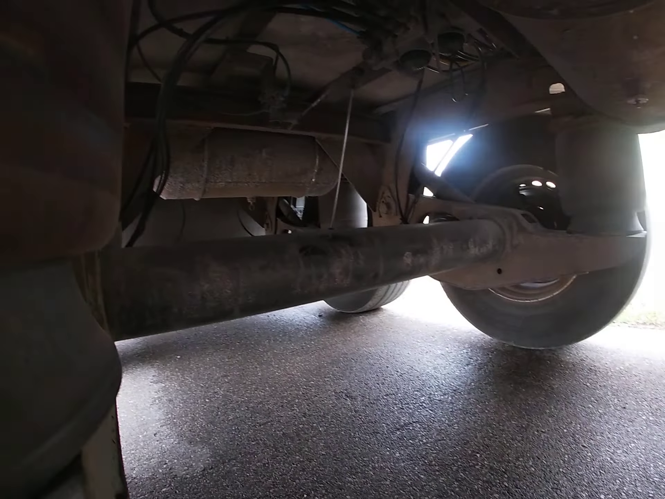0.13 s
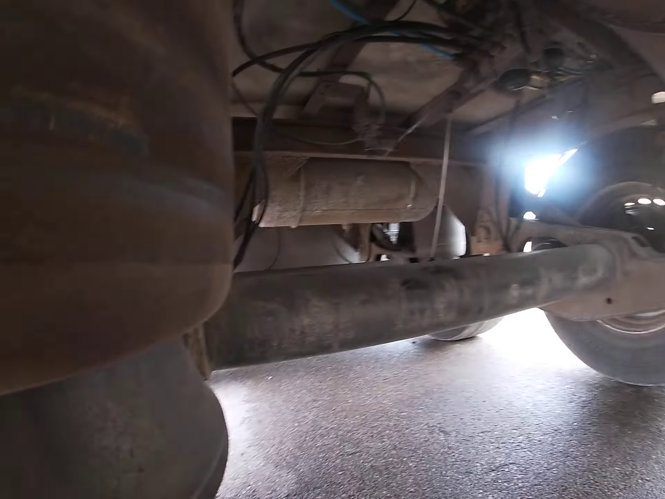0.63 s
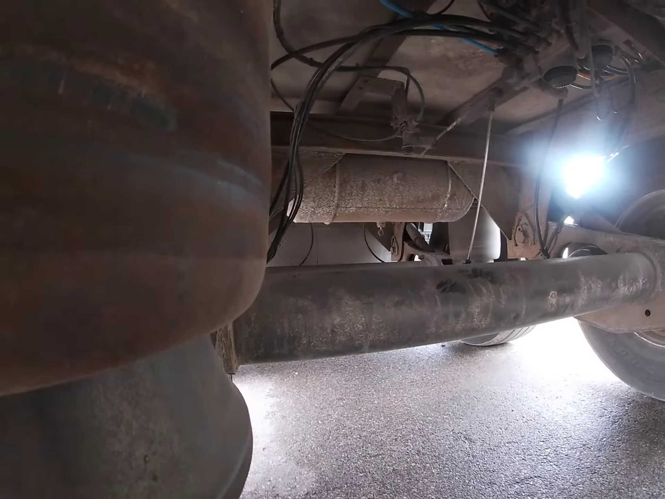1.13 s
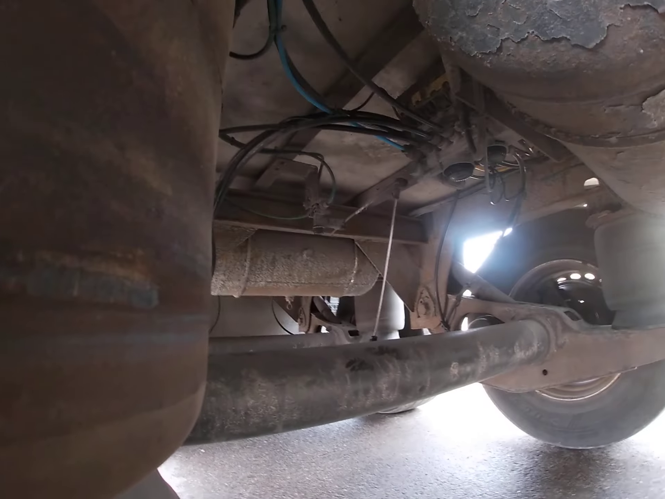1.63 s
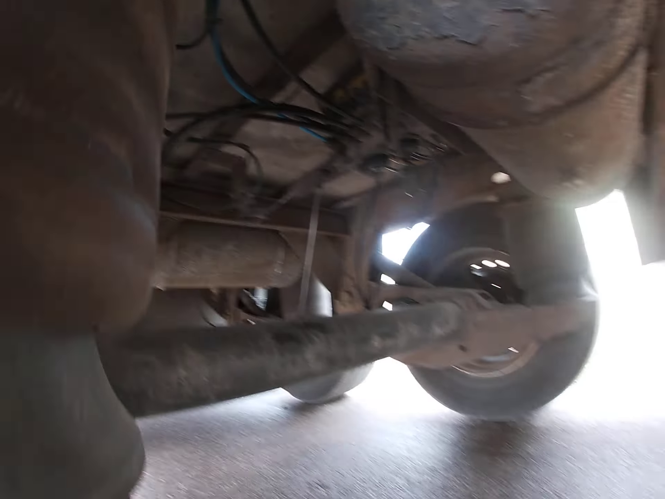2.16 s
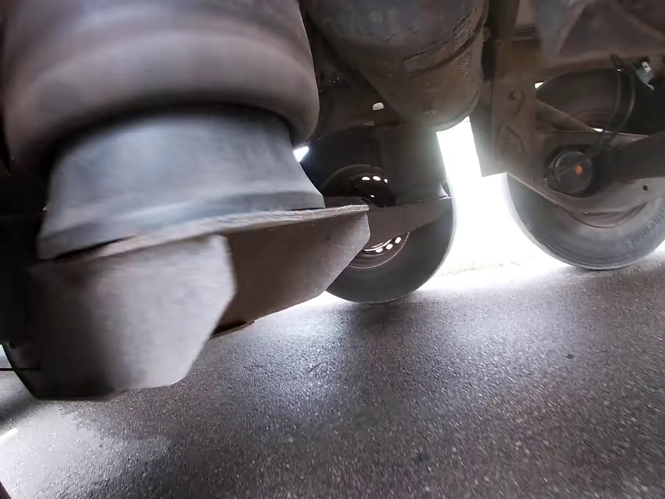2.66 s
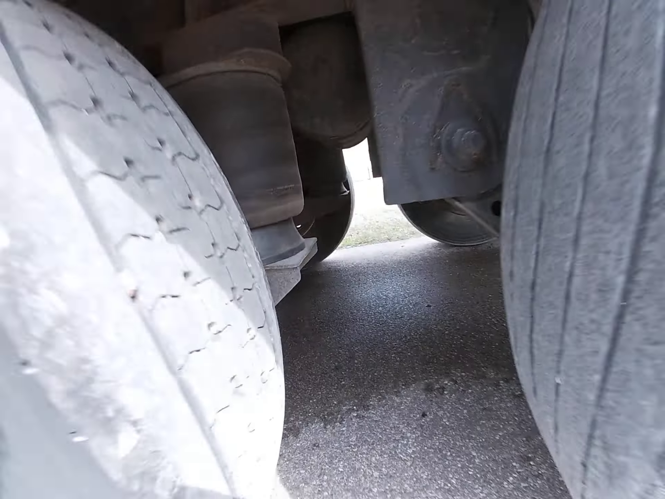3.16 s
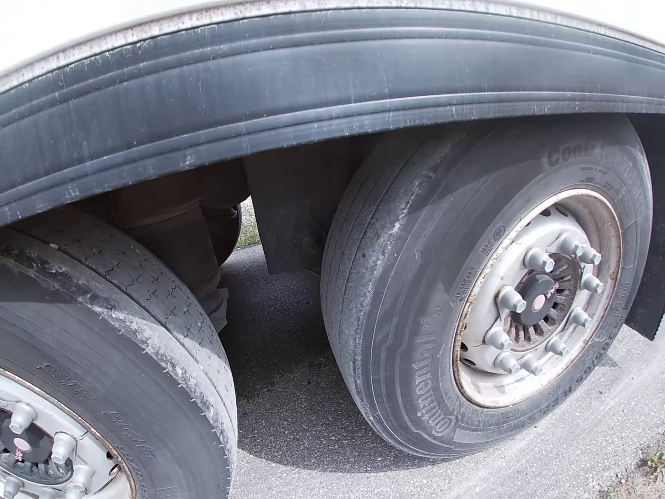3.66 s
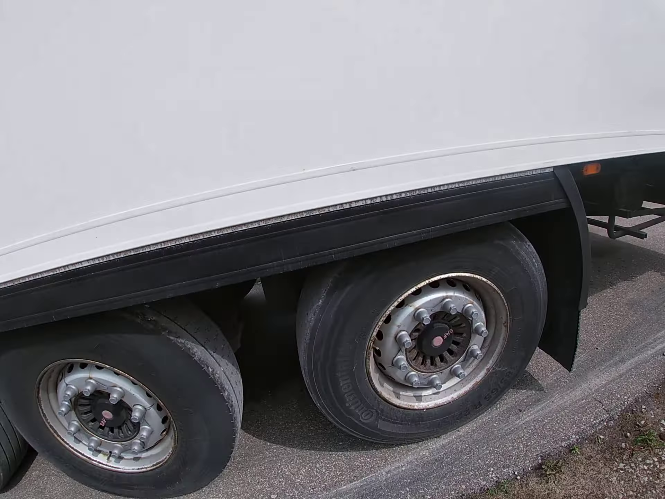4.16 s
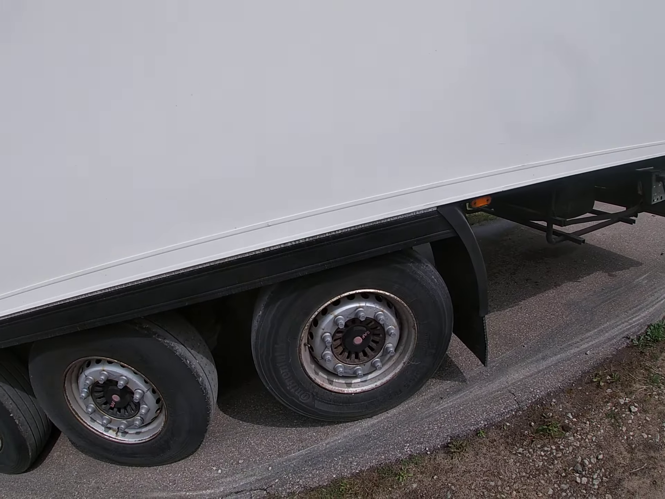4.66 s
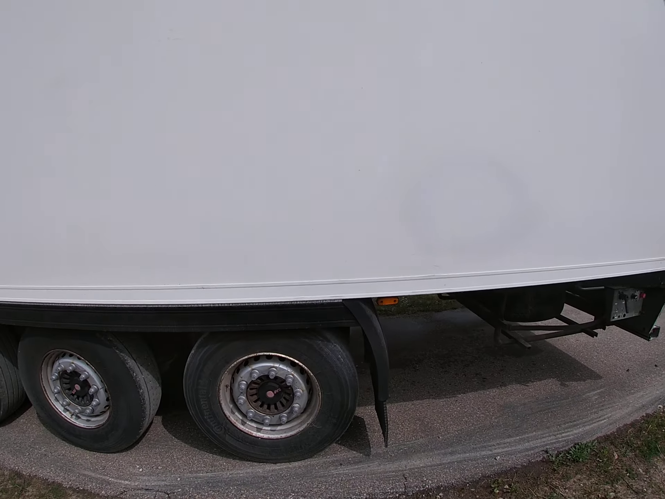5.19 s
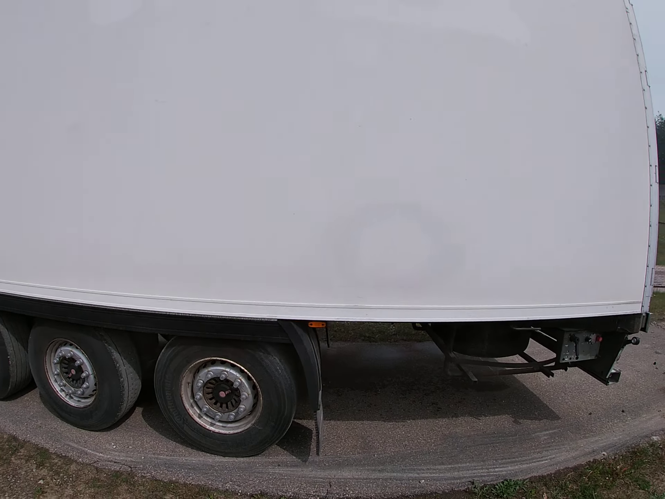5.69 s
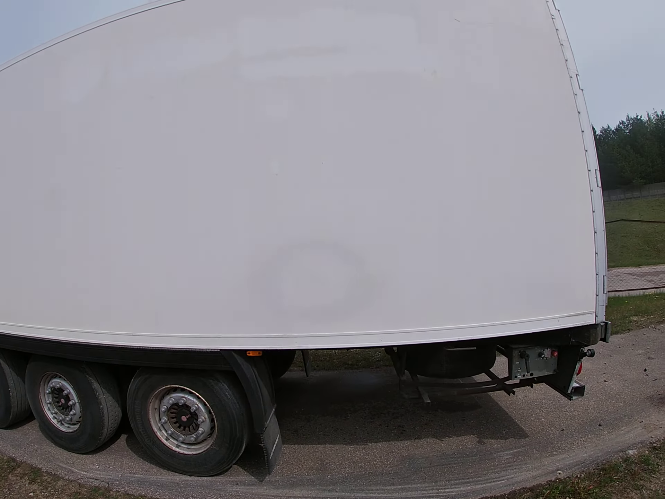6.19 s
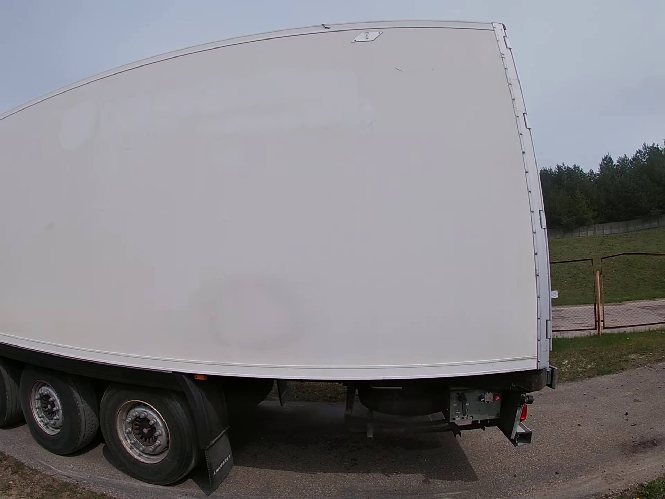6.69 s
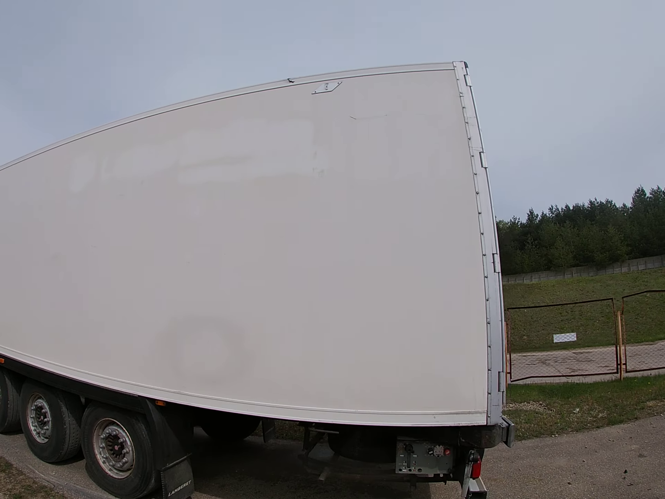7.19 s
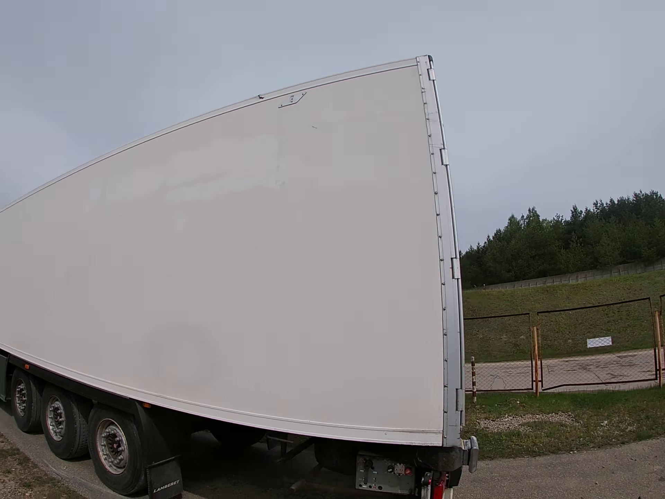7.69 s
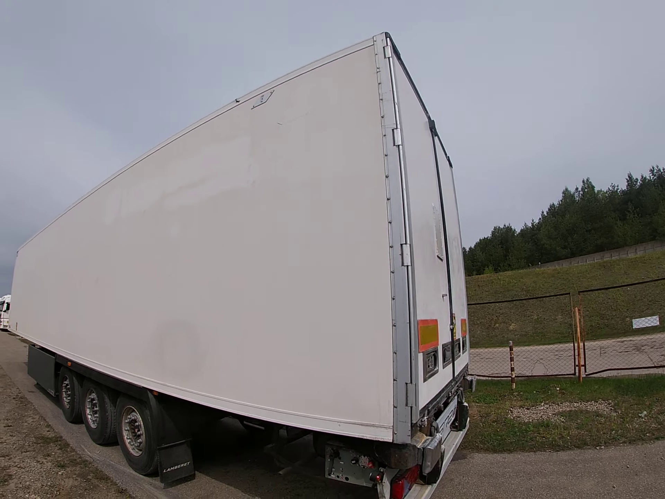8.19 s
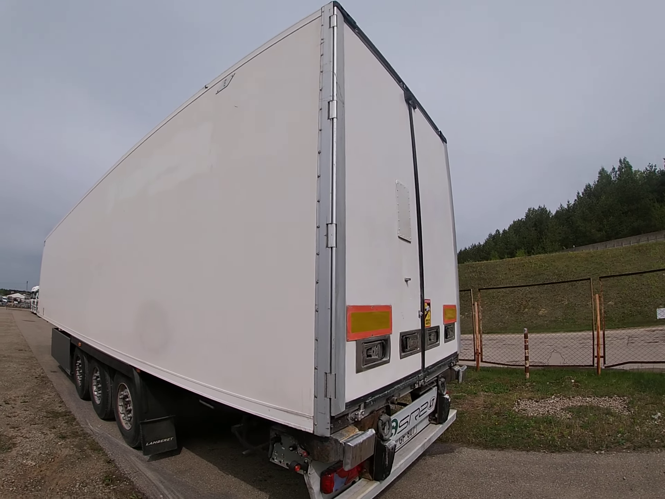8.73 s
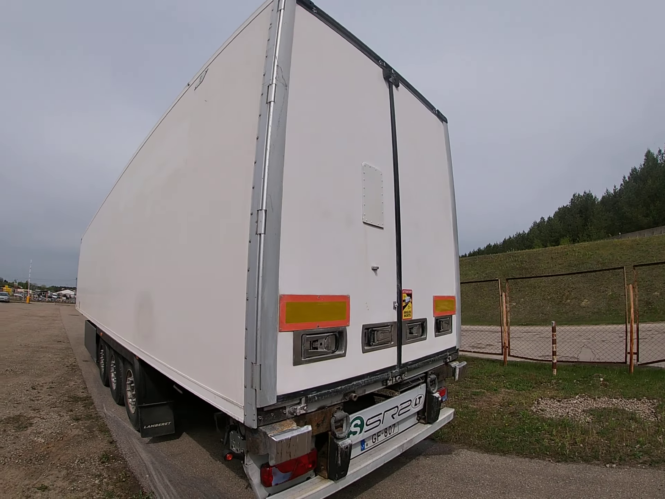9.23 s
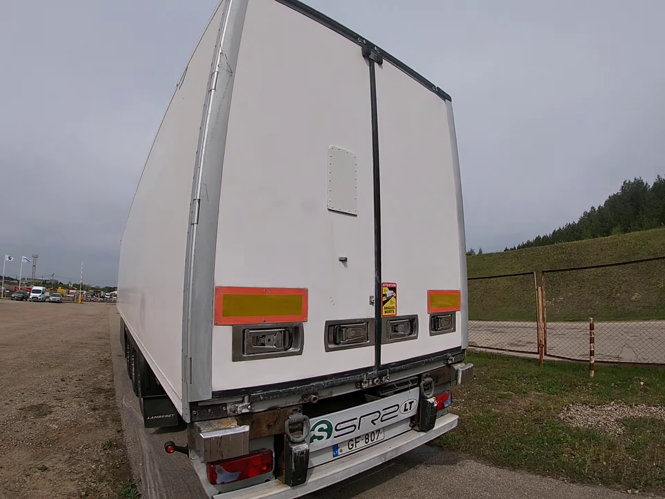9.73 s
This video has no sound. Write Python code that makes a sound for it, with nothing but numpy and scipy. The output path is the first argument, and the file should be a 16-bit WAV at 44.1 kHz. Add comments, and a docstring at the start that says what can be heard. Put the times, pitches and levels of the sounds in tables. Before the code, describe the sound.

Under a parked refrigerated trailer, a cooling-unit diesel drones with a deep, fluttering beat over dull fan roar and faint hiss. The handheld camera's plastic case clicks and creaks close to the microphone. It is then carried outside: shoes scuff grit, a sole squeaks briefly, and wind buffets the microphone while the drone dips and swells.

```python
"""Under and around a refrigerated trailer

The diesel of a trailer's cooling unit drones at a nearly fixed speed, its compressor beating against the firing:
sines at sums of crankshaft and compressor turns, over coloured noise for fans and block.
A hand-held camera sits under the axles, its plastic case creaking as damped modes, then is carried out
over gritty ground (scuffs of spiky grains, one squeak) round the back of the trailer, where noise swells of wind
buffet the microphone. The drone swells and dips, often sinking after hard gusts, as if the recorder turns itself down."""
import sys
import numpy as np
from scipy import signal
from scipy.fft import rfft, irfft, next_fast_len
from scipy.io import wavfile
from scipy.ndimage import uniform_filter1d, map_coordinates

SR = 44100
rng = np.random.default_rng(int(sys.argv[2]) if len(sys.argv) > 2 else 0)


def invert_db(x):
    """Field ratio 10**(x/20) for x, a level in decibels (scalar or array-like)."""
    u = np.asarray(x, float) / 20
    return 10 ** u


def wrap_up_sound(samples):
    """Save the sound to the file named by the first command line argument, as 16-bit audio."""
    columns = np.atleast_2d(samples).T
    # keep every value between -1 and 1, then stretch to whole-number steps
    tamed = np.clip(columns, -1, 1)
    steps = np.round(tamed * 32767).astype(np.int16)
    wavfile.write(sys.argv[1], SR, steps)


N = 434385

# The walk out from under the trailer. Each row: time in seconds, share of open air round the microphone 0-1.
OPEN_AIR = [(0, 0.03), (2.6, 0), (3.15, 0.24), (3.6, 0.98), (9.85, 0.96)]

# Treble hiss. Each row: frequency in Hz, relative level per Hz in dB.
HISS_COLOUR = [(4500, -19), (6000, 1), (7500, 0), (8500, -8), (9500, -24.5)]
# When the hiss fades from its level under the trailer to that outside: start and end in seconds.
HISS_FADE_S = (2.5, 5.3)
HISS_UNDER_DB, HISS_OPEN_DB, HISS_FLICKER_DB = -78, -92, 2.5

# Roar of fans and engine block. Each row: time in seconds, level in dB.
ROAR_LEVEL = [(0, -41), (1.4, -40.5), (2.6, -41.5), (3.26, -45), (3.7, -45), (4.44, -43.5), (4.83, -38.5),
              (5.1, -44), (5.6, -41.5), (6.4, -43), (7.35, -43.5), (8.12, -40), (8.6, -43), (9.4, -41.5),
              (9.85, -43.5)]
# Its colour under the trailer, and outside. Each row: frequency in Hz, relative level per Hz in dB.
ROAR_UNDER = [(82, -33), (140, -9.5), (158, -16), (202, -5), (248, -14.5), (316, -8), (390, -15.5),
              (448, -18.5), (542, -16.5), (994, -22), (1860, -36.5), (7060, -53), (8840, -73.5),
              (11500, -107), (19400, -120)]
ROAR_OPEN = [(150, -31), (250, -10), (391, -5), (504, -4.5), (650, -10.5), (1110, -17), (1590, -18),
             (1790, -22.5), (2110, -24.5), (2270, -25.5), (5010, -41), (5650, -46), (8840, -81.5),
             (11500, -109), (19400, -120)]
# Fuzzy fan lines, low to high. Each row: frequency in Hz, half-width at half amplitude in Hz.
FAN_LINES = [(1200, 250), (1580, 150), (2079, 120)]
# Fan lines over time. Each row: time in seconds, low, middle and upper line level in dB.
FAN_LEVELS = [(0, -76.5, -69.5, -78.5), (2.9, -66.5, -75, -78), (3.5, -52, -62, -72),
              (4.3, -52, -53.5, -61), (4.9, -61.5, -52, -60.5), (5.6, -65, -59.5, -63),
              (7.3, -71.5, -70.5, -67), (8.2, -59.5, -62, -67), (9.85, -50, -60.5, -73.5)]

# Wind at the microphone, its low and its upper band. Each row: time in seconds, level in dB.
BUFFET_LEVEL = [(0, -41), (2.35, -36), (2.7, -28.5), (3.1, -22.5), (3.55, -28.5), (3.95, -19.5),
                (4.3, -26.5), (4.63, -37), (4.86, -20.5), (5.1, -25), (5.4, -28.5), (6.4, -23.5),
                (6.68, -39.5), (6.94, -28), (7.4, -24.5), (7.78, -37), (8.15, -25.5), (8.8, -32.5),
                (8.92, -36), (9.3, -33), (9.85, -33.5)]
BITE_LEVEL = [(0, -40), (2.6, -44), (3.1, -40), (3.3, -40), (3.5, -32.5), (3.75, -40.5), (4.1, -35.5),
              (4.6, -44.5), (4.78, -34.5), (5.0, -33.5), (5.3, -40.5), (5.9, -47), (6.6, -46.5), (7.3, -42),
              (7.8, -45.5), (8.2, -45), (8.6, -35), (9.1, -38.5), (9.5, -32), (9.85, -30.5)]
# Colours of the two bands. Each row: frequency in Hz, relative level per Hz in dB.
BUFFET_COLOUR = [(5, -13), (15, -3.5), (30, -6), (50, 2.5), (75, 1), (125, -2.5), (170, -11.5), (300, -33),
                 (800, -71.5)]
BITE_COLOUR = [(60, -30), (130, -3), (200, 0), (290, -5), (400, -18), (700, -32), (1200, -55)]
# Depth of fast lumps in both bands, and of slower lulls in the open in the low and the upper band.
LUMPS_DB, BUFFET_LULLS_DB, BITE_LULLS_DB = 1, 3, 1.2
# Short low shoves of air. Each row: start in seconds, length in seconds, peak of the swell in dB.
SHOVES = [(3.03, 0.051, -22), (3.28, 0.077, -17), (4.19, 0.094, -22), (5.03, 0.046, -23),
          (6.35, 0.093, -22), (6.49, 0.063, -19), (7.2, 0.1, -28), (8.752, 0.08, -15)]
# Hard gusts that thump the microphone. Each row: start in seconds, peak of the swell in dB, its upper edge in dB.
THUMPS = [(3.977, -28.5, -48), (4.003, -26, -37.5), (4.033, -25, -52), (4.051, -30, -51),
          (4.089, -38, -36.5), (4.107, -29, -44), (4.17, -31, -56), (4.201, -26.5, -51), (4.737, -31, -46),
          (4.777, -39, -48), (4.834, -28, -47), (4.905, -27, -50), (4.955, -25, -50), (4.991, -33, -53),
          (5.051, -32, -45), (5.223, -36, -46), (6.515, -36, -52), (7.22, -28, -38), (7.47, -27, -47),
          (8.759, -22.5, -51), (8.777, -24.5, -51)]
THUMP_S = 0.016
# Colours of the thump and of its upper edge. Each row: frequency in Hz, relative level per Hz in dB.
THUMP_COLOUR = [(40, -7.5), (120, 1.5), (250, 4.5), (380, -3), (600, -20), (900, -40)]
THUMP_EDGE_COLOUR = [(300, -12), (500, 0), (700, -4), (1000, -15), (1500, -28), (2000, -42)]
# Broad roar of the strongest gusts. Each row: start in seconds, length in seconds, peak of the swell in dB.
GUSTS = [(3.96, .2, -47), (4.17, .1, -48), (4.69, .3, -42), (4.86, .3, -42)]

# Shoes scuffing on grit. Each row: start in seconds, length in seconds, peak of the swell in dB.
SCUFFS = [(3.16, 0.04, -64), (3.195, 0.11, -62), (3.245, 0.14, -59), (3.345, 0.022, -59),
          (3.412, 0.02, -65), (4.09, 0.14, -59), (4.24, 0.055, -58), (4.77, 0.21, -60), (4.84, 0.043, -59),
          (4.882, 0.019, -67), (4.938, 0.041, -54.5), (5.565, 0.041, -53.5), (5.61, 0.036, -64),
          (6.129, 0.052, -64.5), (6.768, 0.072, -58), (7.802, 0.27, -63), (9.618, 0.058, -63)]
# Colour of the grit. Each row: frequency in Hz, relative level per Hz in dB.
GRIT_COLOUR = [(800, -24), (1500, 5), (2500, 6), (3500, -2), (5000, -5), (6500, -19), (9000, -20.5),
               (10500, -61.5)]
GRIT_CLUMPS_DB = 2.5
# Squeak of a sole. Each row: time in seconds, pitch in Hz, level in dB.
SQUEAK = [(3.24, 3750, -81), (3.255, 3700, -69), (3.275, 3450, -60), (3.3, 3300, -64), (3.318, 3280, -63),
          (3.33, 3250, -85)]
# Overtone as a frequency ratio, its relative level, and phase scatter in radians.
SQUEAK_OVERTONE, SQUEAK_OVERTONE_DB, SQUEAK_ROUGH = 1.4, -3, 0.49

# Creaks of the camera's case. Each row: start in seconds, low, middle and top modes' peak in dB.
CREAKS = [(0.7903, -37, -52, -73), (0.8026, -38, -57, -66), (0.8974, -30.5, -39.5, -63),
          (0.9721, -30.5, -43, -63.5), (1.0045, -30.5, -43, -62), (1.1885, -22.5, -25, -46.5),
          (1.385, -36, -21, -34), (1.4507, -31, -19, -31), (1.4843, -38, -19.5, -33.5),
          (1.52, -32, -26, -41), (2.3092, -34.5, -39.5, -55), (2.852, -53, -40, -48),
          (2.8779, -57, -46, -52), (2.897, -36, -43, -61.5), (3.332, -62, -58, -58.5),
          (3.347, -59, -54, -55.5), (3.354, -64, -59, -59), (3.421, -56, -45, -64), (4.6064, -51, -50, -52),
          (4.847, -47, -41, -66), (5.452, -50, -64, -59), (5.508, -53, -50, -60), (5.572, -60, -56, -56.5),
          (5.608, -63, -58, -57.5), (9.0634, -49, -44, -54)]
# Faint dull slips of the case. Each row: start in seconds, peak of the low modes in dB, pitch in Hz.
SLIPS = [(0.0605, -40, 1250), (0.085, -42.5, 1290), (0.106, -41, 1150), (0.118, -46, 1280),
         (0.133, -37, 1350), (0.144, -38, 1350), (0.158, -43, 1350), (0.175, -41, 1450),
         (0.1925, -39, 1430)]
SLIP_DULL_DB = 29  # how much weaker a slip rings the middle modes than the low ones
# Low, middle and top modes of the case. Each row: frequency in Hz, bandwidth in Hz, relative level in dB.
LOW_MODES = [(1400, 150, 10), (1130, 310, -11), (1530, 150, -4)]
MIDDLE_MODES = [(1100, 350, -7), (1560, 330, -1), (2400, 240, -6), (3070, 340, 0.5), (3800, 500, -2),
                (4250, 330, -0.5)]
TOP_MODES = [(5350, 250, -5), (6030, 330, 0), (6600, 300, -7), (7560, 600, 0), (8680, 220, -15),
             (9750, 1000, -7)]

# The drone over time, often sinking after hard gusts.
# Each row: time in seconds, firing tone level in dB, its octave level in dB.
FIRING_LEVELS = [(0, -13.5, -31), (2.4, -14, -29), (2.96, -14.5, -27), (3.3, -21.5, -25.5),
                 (3.6, -29.5, -29.5), (4.1, -23, -37.5), (4.4, -37.5, -40.5), (4.7, -28.5, -31.5),
                 (4.85, -18.5, -42), (5.05, -19.5, -25.5), (5.21, -27.5, -33.5), (5.45, -21.5, -40.5),
                 (5.8, -17, -27.5), (6.25, -16.5, -33.5), (6.62, -22.5, -39), (6.95, -16, -29),
                 (7.3, -22.5, -30), (7.9, -23, -32), (8.07, -18, -25.5), (8.72, -18.5, -30),
                 (8.8, -28, -25), (9.0, -33, -35), (9.41, -20.5, -22), (9.71, -22.5, -27),
                 (9.85, -23.5, -22)]
FIRING_HZ_UNDER, FIRING_HZ_OPEN, THROB_HZ = 51.35, 51.21, 33.6  # throb: one compressor turn
THROB_UNDER_DB, THROB_OPEN_DB = -30.5, -26.5
# Weaker tones. Each row: crankshaft multiple, compressor multiple, level under the trailer in dB,
# level outside in dB, both before the gain over time.
PARTIALS = [(0, .5, -51, -50), (1.0, 0, -44, -47), (1.5, 0, -49, -52), (1.0, .5, -46, -50),
            (9.0, 1, -53, -58), (4.5, 0, -39, -41), (6.0, 0, -61, -41), (8.0, 0, -50, -45),
            (10.0, 0, -57, -51), (11.0, 0, -69, -55), (11.5, 0, -57, -67), (12.0, 0, -44, -54),
            (13.0, 0, -59, -59), (14.0, 0, -52, -60), (17.0, 0, -57, -59), (18.0, 0, -58, -70),
            (28.0, 0, -65, -76), (2.0, 1, -43, -39), (4.0, 1, -46, -48), (6.0, 1, -44, -47),
            (8.0, 1, -56, -62), (10.0, 1, -57, -67), (16.0, 1, -52, -70), (2.0, -1, -50, -56),
            (4.0, -1, -44, -52), (6.0, -1, -44, -38)]
# Two pairs of whines. Each row: crankshaft multiple, compressor multiple, level within the pair in dB.
LOW_WHINE = [(9, .5, -3), (11, -.5, -10)]
HIGH_WHINE = [(18, 1, -4), (22, -1, -3)]
# Levels of weaker tones and whines over time, dipping after gusts. Each row: time in seconds,
# gain of the weaker tones in dB, low whine pair level in dB, high whine pair level in dB.
TONE_LEVELS = [(0, 1, -48.5, -61), (2.6, 0, -46.5, -57), (3.5, -6, -43, -58), (4.4, -5, -53.5, -55.5),
               (4.95, 1.5, -50, -45.5), (5.7, -4, -43, -49), (6.4, -5, -44, -45.5),
               (6.9, -4.5, -47.5, -42.5), (7.3, -7, -43.5, -50), (7.75, -3, -57, -48),
               (7.9, -4, -56, -40.5), (8.25, -3.5, -43, -42), (8.4, 3.5, -40, -44.5),
               (8.6, 3.5, -31.5, -45.5), (8.78, 0, -33, -52.5), (8.95, -11, -46.5, -51.5),
               (9.2, -3, -48, -44.5), (9.35, 7.5, -38.5, -46.5), (9.85, 2, -44.5, -48.5)]
WAVER_UNDER, WAVER_OPEN = 0.17, 0.95  # share of each tone's full waver depth
OCTAVE_LAG = 2.7  # radians; tied to the firing, the octave sharpens each trough
BEAT_LAG = -0.8  # radians; shared by sums of firing and throb, so the beat is even


def unit(x):
    """Scale to rms 1."""
    return x / np.sqrt(np.mean(x ** 2) + 1e-20)


def curves(rows):
    """One value per sample for each column after the time."""
    s, *columns = np.transpose(rows)
    return [np.interp(np.arange(N) / SR, s, column) for column in columns]


def wobble(rate):
    """A smooth random curve, rate knots a second."""
    knots = rng.standard_normal(int(N * rate / SR) + 4)
    return map_coordinates(knots, [np.arange(N) * rate / SR])


def filtered(x, response):
    """x shaped in the spectrum by a response of frequency."""
    size = next_fast_len(N + 8192)
    return irfft(rfft(x, size) * response(np.fft.rfftfreq(size, 1 / SR)), size)[:N]


def colour(points):
    """Gain from (Hz, dB) points on a log axis, 120 dB down outside them."""
    f, db = np.transpose(points)
    return lambda hz: invert_db(np.interp(np.log(hz + 1), np.log(f + 1), db, left=-120, right=-120))


def rush(spectrum, patchy_db):
    """Coloured noise of rms 1 with patches of random gain in time and frequency."""
    cells = signal.stft(rng.standard_normal(N), nperseg=512)[2]
    patches = uniform_filter1d(rng.standard_normal(cells.shape), 6, 0)
    patches = unit(uniform_filter1d(patches, 12, 1))
    noise = signal.istft(cells * invert_db(patchy_db * patches), nperseg=512)[1][:N]
    return unit(filtered(noise, colour(spectrum)))


def even(x, span_s):
    """Hold a noise's short-term level steady, so that an envelope decides it."""
    power = np.abs(uniform_filter1d(x ** 2, round(span_s * SR)))
    return x / np.sqrt(power + 0.1)


def swells(rows):
    """Sum of quick rises and slower falls from (start, length, dB) rows, each peaking a third of the way in."""
    total = np.zeros(N)
    for s, length, db in rows:
        u = np.clip((np.arange(N) / SR - s) * 3 / length, 0, 30)
        total += invert_db(db) * u * np.exp(1 - u)
    return total


def ringing(modes, t, draw):
    """Damped sines of joint peak 1; wider modes die sooner, and each blow varies strengths and phases."""
    hz, width, db = np.transpose(modes)[:, :, None]
    strength, phase = draw[:, :len(modes), None]
    turn = np.pi * np.arange(len(modes))[:, None]  # neighbours start opposite, so no gaps between them
    decay = invert_db(db + 1.2 * strength) * np.exp(-np.pi * width * t)
    ring = np.sum(decay * np.sin(2 * np.pi * hz * t + turn + 0.3 * phase), 0)
    ring *= 1 - np.exp(-t / 0.00057)  # soft onset
    return ring / np.abs(ring).max()


def hiss():
    """A thin treble noise whose level flickers, clearer under the trailer."""
    level_db = np.interp(np.arange(N) / SR, HISS_FADE_S, [HISS_UNDER_DB, HISS_OPEN_DB])
    return invert_db(level_db + HISS_FLICKER_DB * wobble(8.9)) * rush(HISS_COLOUR, patchy_db=2.0)


def roar():
    """Broad noise of fans and block: dull under the trailer, fuller in the open, crossfaded by power."""
    level_db, = curves(ROAR_LEVEL)
    air, = curves(OPEN_AIR)
    under = np.sqrt(1 - air) * rush(ROAR_UNDER, patchy_db=0.74)
    out = np.sqrt(air) * rush(ROAR_OPEN, patchy_db=0.68)
    return invert_db(level_db + 0.11 * wobble(6.2)) * (under + out)


def fan_whine():
    """Fuzzy lines: narrow noise round each fan's blade rate, rising and falling over time."""
    sound = np.zeros(N)
    for (hz, width), db in zip(FAN_LINES, curves(FAN_LEVELS)):
        band = filtered(rng.standard_normal(N), lambda f: 1 / (1 + ((f - hz) / width) ** 2))
        sound += invert_db(db) * unit(band)
    return sound


def wind():
    """Eddies press on the microphone in lumps, lulls and shoves; gusts bite higher up, the hardest thump."""
    air, = curves(OPEN_AIR)
    buffet_db, = curves(BUFFET_LEVEL)
    bite_db, = curves(BITE_LEVEL)
    lumps_db = LUMPS_DB * wobble(18)
    low_lumps = invert_db(lumps_db + BUFFET_LULLS_DB * air * wobble(8))
    buffet = invert_db(buffet_db) * unit(low_lumps * rush(BUFFET_COLOUR, patchy_db=1.0))
    high_lumps = invert_db(lumps_db + BITE_LULLS_DB * air * wobble(7.1))
    bite = invert_db(bite_db) * unit(high_lumps * even(rush(BITE_COLOUR, patchy_db=2.3), span_s=0.13))
    shoves = swells(SHOVES) * even(rush(BUFFET_COLOUR, patchy_db=0.9), span_s=0.06)
    thump_rows = [(s, THUMP_S, db) for s, db, _ in THUMPS]
    thumps = swells(thump_rows) * even(rush(THUMP_COLOUR, patchy_db=2.5), span_s=0.015)
    edge_rows = [(s, THUMP_S, db) for s, _, db in THUMPS] + list(GUSTS)
    edges = swells(edge_rows) * even(rush(THUMP_EDGE_COLOUR, patchy_db=2.4), span_s=0.035)
    return buffet + bite + shoves + thumps + edges


def scuffs():
    """Dense grit cracking under a sole: small spiky grains in clumps on a swell."""
    spikes_db = np.minimum(1.4 * rng.exponential(size=N), 8)
    grains = (rng.random(N) < 0.05) * rng.standard_normal(N) * invert_db(spikes_db)
    grains = grains * invert_db(GRIT_CLUMPS_DB * wobble(90))
    return swells(SCUFFS) * even(unit(filtered(grains, colour(GRIT_COLOUR))), span_s=0.062)


def squeak():
    """A short rough scrape of a sole: two sines with scattered phase, their pitch sagging."""
    hz, db = curves(SQUEAK)
    turn = 2 * np.pi * np.cumsum(hz) / SR
    low = np.sin(turn + SQUEAK_ROUGH * wobble(300))
    overtone = np.sin(SQUEAK_OVERTONE * turn + 2 * SQUEAK_ROUGH * wobble(300))
    pair = low + invert_db(SQUEAK_OVERTONE_DB) * overtone
    sounding = db > db[0]  # silent at and below the level of the first row
    return invert_db(db + 3 * wobble(120)) * pair * sounding


def creaks():
    """Each slip in the case rings its groups of modes in its own proportion."""
    t = np.arange(SR // 40) / SR
    draws = rng.standard_normal((len(CREAKS) + len(SLIPS), 3, 2, 6))
    sound = np.zeros(N + len(t))
    for (s, low_db, middle_db, top_db), (a, b, c) in zip(CREAKS, draws):
        blow = invert_db(low_db) * ringing(LOW_MODES, t, a)
        blow += invert_db(middle_db) * ringing(MIDDLE_MODES, t, b)
        blow += invert_db(top_db) * ringing(TOP_MODES, t, c)
        sound[round(s * SR):][:len(t)] += blow
    for (s, db, hz), (a, b, _) in zip(SLIPS, draws[len(CREAKS):]):
        pitched_t = t * hz / LOW_MODES[0][0]  # moves the first low mode to the slip's pitch
        dull = ringing(LOW_MODES, pitched_t, a) + invert_db(-SLIP_DULL_DB) * ringing(MIDDLE_MODES, t, b)
        sound[round(s * SR):][:len(t)] += invert_db(db) * dull
    return sound[:N]


def engine():
    """Sines at sums of crankshaft and compressor turns; each wavers a little as the air path shifts."""
    firing_db, octave_db = curves(FIRING_LEVELS)
    weaker_db, low_db, high_db = curves(TONE_LEVELS)
    air, = curves(OPEN_AIR)

    def mix(under, out):
        """Blend from under the trailer to the open."""
        return under + air * (out - under)

    crank = np.pi * np.cumsum(mix(FIRING_HZ_UNDER, FIRING_HZ_OPEN)) / SR  # two firings a turn
    pump = 2 * np.pi * THROB_HZ * np.arange(N) / SR

    def tone(k, c, db, full_waver_db, lag=None):
        """One steady tone with slow level and phase drift, more in the open."""
        drift = (0.15 + air) * (0.06 + 0.022 * k) * wobble(7)
        lag = rng.uniform(0, 2 * np.pi) if lag is None else lag
        waver_db = full_waver_db * mix(WAVER_UNDER, WAVER_OPEN) * wobble(6)
        return np.sqrt(2) * invert_db(db + waver_db) * np.cos(k * crank + c * pump + drift + lag)

    sound = tone(2, 0, firing_db, full_waver_db=0.54, lag=0)
    sound += tone(4, 0, octave_db, full_waver_db=1.5, lag=OCTAVE_LAG)
    sound += tone(0, 1, mix(THROB_UNDER_DB, THROB_OPEN_DB), full_waver_db=3.5, lag=0)
    for k, c, under_db, out_db in PARTIALS:
        lag = BEAT_LAG if c == 1 else None
        sound += tone(k, c, mix(under_db, out_db) + weaker_db, full_waver_db=2.1, lag=lag)
    for k, c, db in LOW_WHINE:
        sound += tone(k, c, db + low_db, full_waver_db=1.0)
    for k, c, db in HIGH_WHINE:
        sound += tone(k, c, db + high_db, full_waver_db=3.0)
    return sound


def scene():
    """All sources at the one microphone."""
    background = hiss() + roar() + fan_whine() + wind()
    near = scuffs() + squeak() + creaks()
    return (background + near + engine())[None]


def band_limit(x):
    """A steep low-pass at the top of the band."""
    return signal.sosfilt(signal.butter(12, 10600, fs=SR, output="sos"), x)


def record(dry):
    """The input stage rounds off the highest peaks and sits on a small offset; short fades at both ends."""
    rounded = dry / (1 + np.abs(dry / 0.42) ** 11) ** (1 / 11)  # ceiling 0.42 of full scale
    from_end = np.minimum(np.arange(N), np.arange(N)[::-1])
    fade = np.clip(from_end / (0.006 * SR), 0, 1)
    offset = 0.0016  # of full scale
    return band_limit(rounded * fade + offset)


dry = scene()
out = record(dry)
wrap_up_sound(out)
```